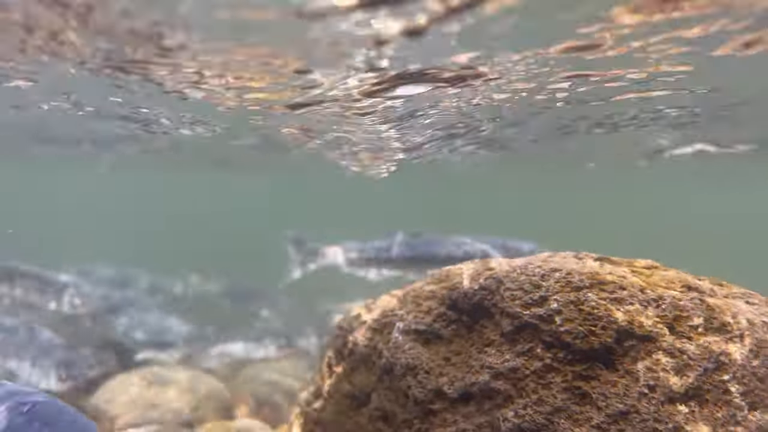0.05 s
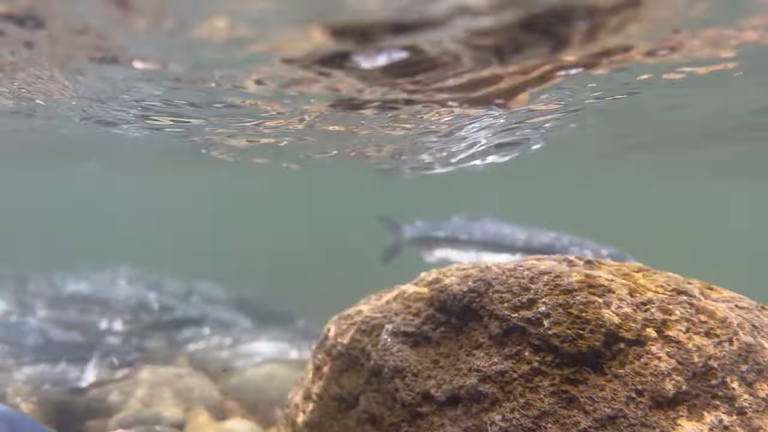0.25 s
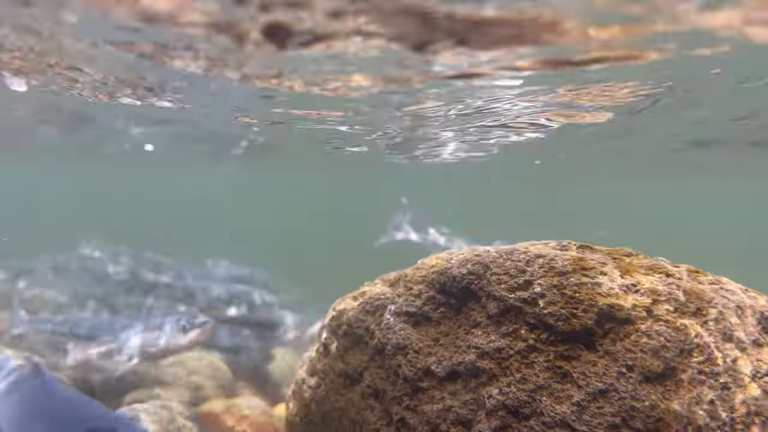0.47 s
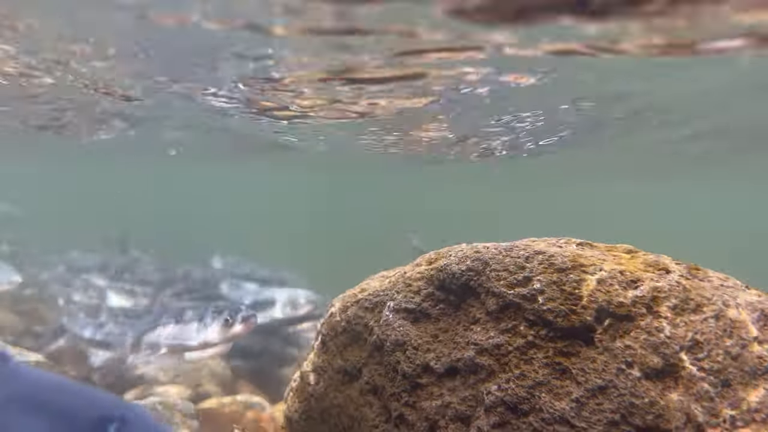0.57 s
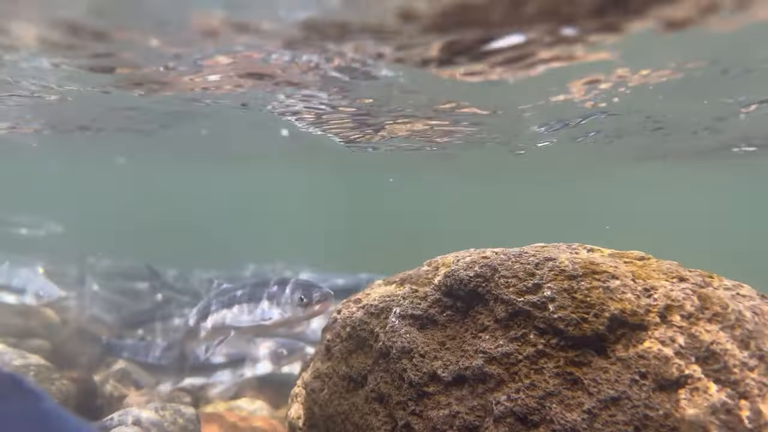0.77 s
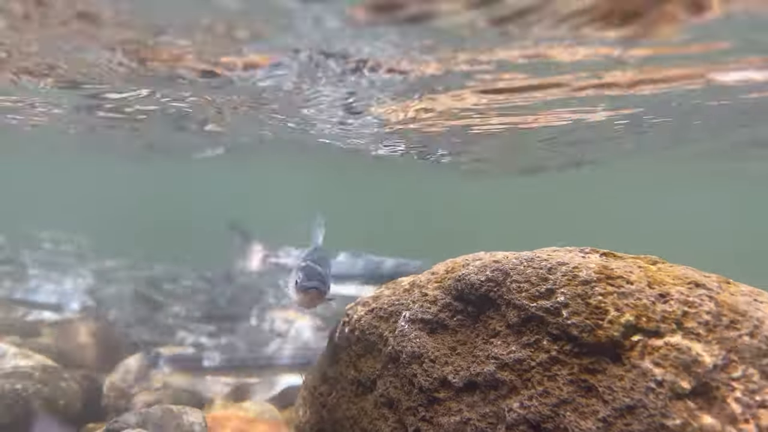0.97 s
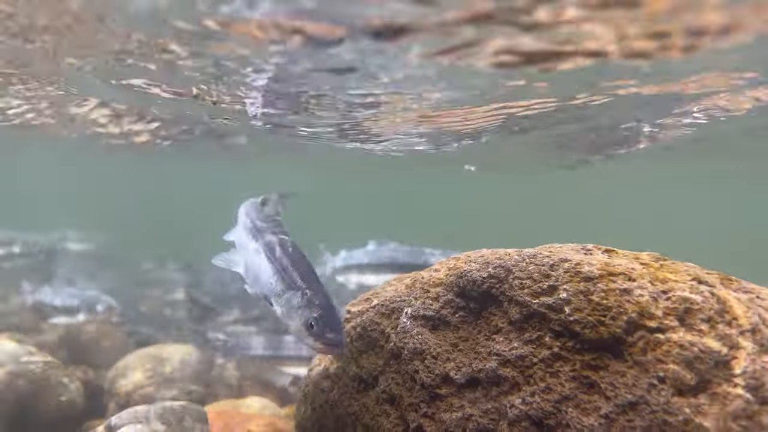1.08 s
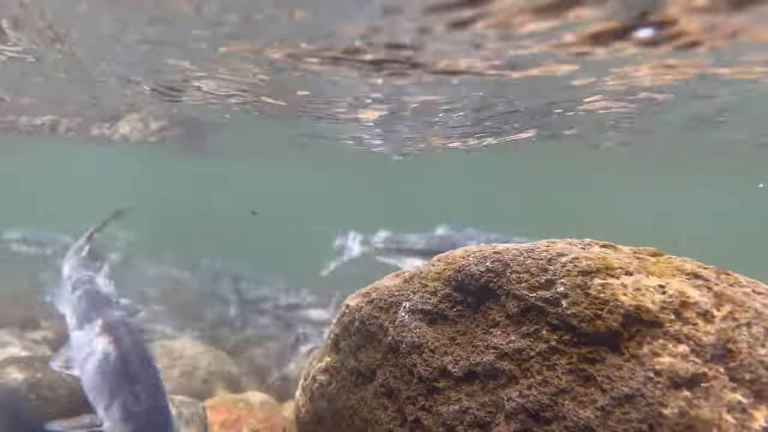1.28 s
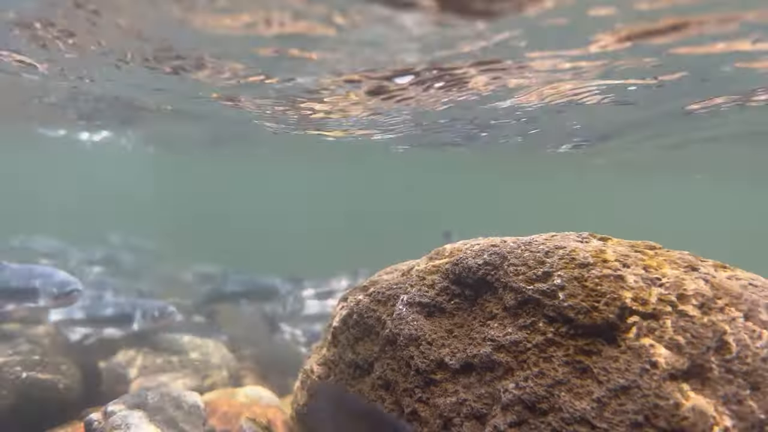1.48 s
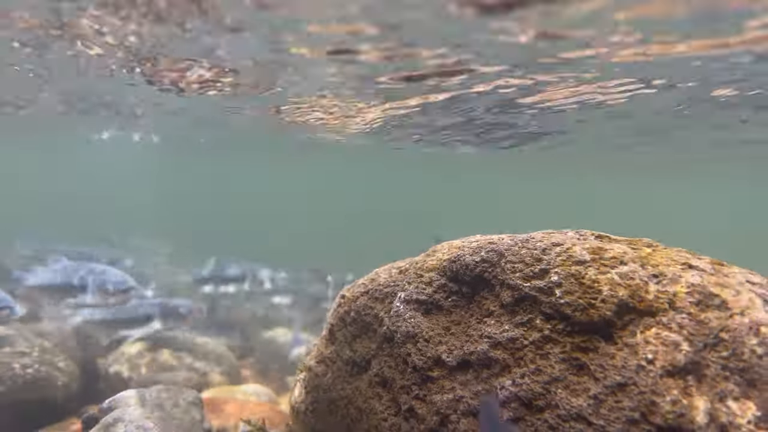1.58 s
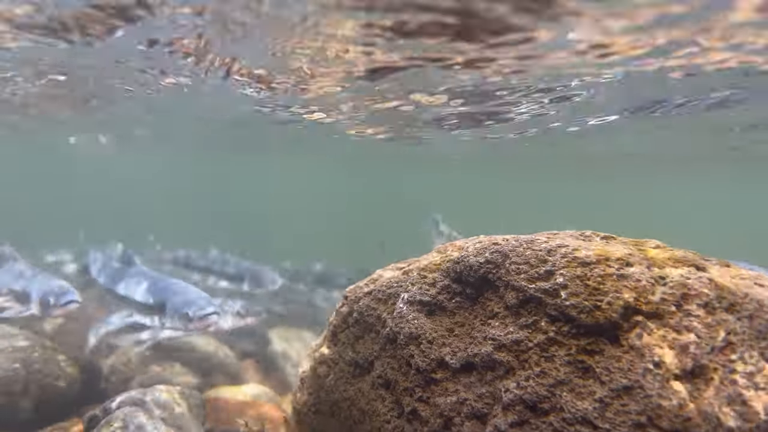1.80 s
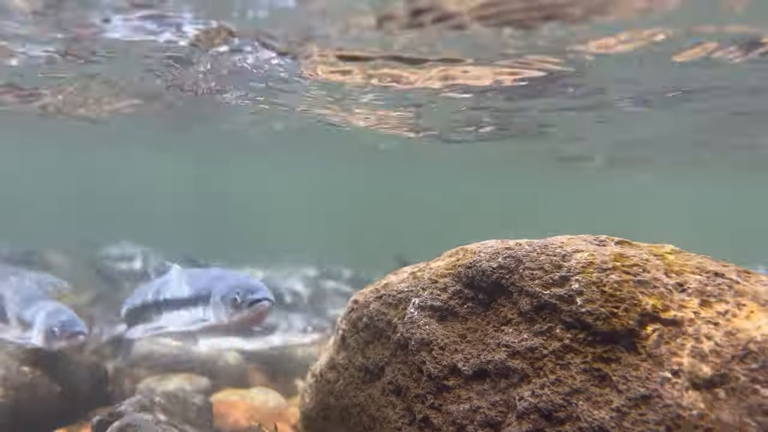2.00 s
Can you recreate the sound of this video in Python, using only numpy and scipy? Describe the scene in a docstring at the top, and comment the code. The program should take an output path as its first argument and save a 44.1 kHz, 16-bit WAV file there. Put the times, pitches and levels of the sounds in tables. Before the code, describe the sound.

Low underwater river rumble with pebbles knocking and small bubbles popping.

```python
"""A low underwater rumble: the current of a shallow river pushes on a camera housing and surges in gulps.
Pebbles knock and tick on the bed over a wash of grit, and one stone clacks close by.
Bubbles ring as they pinch off, a few rising in pitch as they die away.
The left port hears the river a little later and duller than the right; a limiter holds down the peaks."""
import sys
import numpy as np
from scipy import signal
from scipy.fft import rfft, irfft, next_fast_len
from scipy.io import wavfile
from scipy.ndimage import uniform_filter1d, minimum_filter1d

SR = 44100
rng = np.random.default_rng(int(sys.argv[2]) if len(sys.argv) > 2 else 0)


def materialize(psi):
    """Save the field psi as 16-bit PCM at rate SR to the path in sys.argv[1].

    A 1-D psi becomes a single channel; in a 2-D psi each row is a channel.
    """
    bounded = np.clip(np.atleast_2d(psi).T, -1, 1)
    quanta = np.round(bounded * 32767).astype(np.int16)
    wavfile.write(sys.argv[1], SR, quanta)


N = 90404


def undb(db):
    """Decibels to gain."""
    return 10 ** (np.asarray(db) / 20)


def unit(x):
    """Scale to rms 1."""
    return x / np.sqrt(np.mean(x ** 2) + 1e-20)


def add(out, at, x):
    """Mix x into out, starting at a time in seconds."""
    i = max(int(at * SR), 0)
    out[i:i + len(x)] += x[:max(len(out) - i, 0)]


def gains(curve, size):
    """Gain per frequency bin from an EQ curve of (Hz, dB) points."""
    hz, db = np.array(curve, float).T
    return undb(np.interp(np.log(np.fft.rfftfreq(size, 1 / SR) + 1), np.log(hz), db))


def colour(x, curve):
    """Filter x through an EQ curve."""
    size = next_fast_len(len(x) + 4096)
    return irfft(rfft(x, size) * gains(curve, size), size)[:len(x)]


def wobble(per_second):
    """A smooth random drift of rms 1."""
    hold = int(SR / per_second)
    steps = np.repeat(rng.standard_normal(N // hold + 1), hold)
    return unit(uniform_filter1d(uniform_filter1d(steps, hold), hold)[:N])


# The left port against the right. Each row: frequency in Hz, gain in dB, phase lag in radians.
LEFT_PORT = [(40, -2.8, 0.3), (150, -2.8, 0.5), (330, -7, .75), (450, -10, 1.4), (640, -13, 2.5),
             (800, -9.5, 3.4), (1000, -3.5, 4.4), (1300, -8.5, 4.9), (2100, -14, 5.8), (2400, -26, 5),
             (2900, -16, 3), (4630, -23.5, 5.5), (9210, -4, 7.5)]
def ports(x):
    """Mono to stereo: the housing's left port hears x later and duller, the right hears it as it is."""
    size = next_fast_len(N + 4096)
    hz, db, lag = np.array(LEFT_PORT).T
    delay = np.exp(-1j * np.interp(np.fft.rfftfreq(size, 1 / SR), hz, lag))
    left = irfft(rfft(x, size) * gains(list(zip(hz, db)), size) * delay, size)[:N]
    return np.array([left, x])


def wide_noise(curve, width):
    """Coloured noise at both ports, widened by a second noise that reaches the left alone."""
    stereo = ports(unit(colour(rng.standard_normal(N), curve)))
    stereo[0] += width * unit(colour(rng.standard_normal(N), curve))
    return stereo


# The tone of the rumble and of the wash. Each row: frequency in Hz, gain in dB.
RUMBLE_EQ = [(20, -21.5), (35, -4), (65, 3.5), (120, -5.5), (200, -9), (320, -14), (500, -23), (900, -41),
             (2000, -76.5), (12000, -120)]
WASH_EQ = [(150, -18), (400, -1.5), (700, 3), (1100, 0.5), (1500, -11), (2100, -22.5), (3000, -32),
           (5000, -39.5), (9000, -63.5)]
# Fader moves of the flow. Each row: time in seconds, rumble fader in dB, wash fader in dB.
FLOW_FADERS = [(0.0, -35.5, -50.5), (0.14, -25, -38), (0.26, -26.5, -48.5), (0.41, -25.5, -36.5),
               (0.49, -27, -41), (0.55, -26.5, -37.5), (0.68, -28, -44), (0.8, -25, -39.5),
               (0.87, -26.5, -40.5), (0.94, -28, -33), (1.01, -33, -44), (1.09, -29.5, -53.5),
               (1.15, -38.5, -54), (1.33, -37, -47.5), (1.45, -27.5, -41), (1.55, -32.5, -45.5),
               (1.62, -26, -40.5), (1.77, -36, -44), (1.91, -38, -51.5), (2.03, -42.5, -54)]
def current():
    """The bed of the mix: water rumbles on the housing under a wash of tiny bubbles and grit."""
    t = np.arange(N) / SR
    times, rumble_db, wash_db = np.array(FLOW_FADERS).T
    rumble = wide_noise(RUMBLE_EQ, width=0.65)
    rumble *= undb(np.interp(t, times, rumble_db) + 3.5 + wobble(18))
    grains_per_s, grain_spread_db = 140, 5.5
    grains = (rng.random(N) < grains_per_s / SR) * rng.choice([-1, 1], N)
    grains = grains * undb(grain_spread_db * np.minimum(rng.exponential(size=N), 2.6))
    grit = ports(unit(colour(grains, WASH_EQ))) * undb(-3.5)
    fizz = wide_noise(WASH_EQ, width=0.56) * undb(-0.5 + 2 * wobble(30))
    wash = signal.sosfilt(signal.butter(4, 10000, fs=SR, output="sos"), fizz + grit)
    return rumble + wash * undb(np.interp(t, times, wash_db))


def thump(hz, t60, attack_s=0.0039):
    """A soft push of water that rocks the housing for a few cycles."""
    t = np.arange(int(2 * t60 * SR)) / SR
    attack = 1 - np.exp(-(t / attack_s) ** 2)
    return np.sin(2 * np.pi * hz * t) * attack * np.exp(-np.log(1000) * t / t60)


# Gulps of the current. Each row: start in seconds, length in seconds, level in dB, centre in Hz.
SURGES = [(.04, .04, -25, 150), (0.25, .036, -15.5, 150), (0.262, .036, -19, 210), (0.308, 0.024, -20, 140),
          (0.366, .05, -13, 175), (0.488, 0.062, -21, 161.6), (0.699, .03, -13, 153.4),
          (0.877, 0.061, -6, 221), (1.084, .035, -24.5, 143), (1.342, 0.033, -28, 160),
          (1.492, .03, -17.5, 165), (1.643, .04, -22.5, 132), (1.691, 0.029, -31.5, 202)]
# Shoves of water. Each row: start in seconds, pitch in Hz, level in dB, seconds to fade by 60 dB.
THUMPS = [(0.287, 65.4, -2.5, 0.14), (0.385, 190, -6, .04), (0.695, 65, -7, .10), (0.926, 52.15, -1, .10),
          (1.064, 80, -11, 0.13), (1.231, 60.5, -6, 0.091), (1.496, 81.9, 0.5, 0.1), (1.569, 150, 5, 0.028),
          (1.727, 75.3, -18.5, 0.18), (1.824, 69.7, -15, 0.041)]
def eddies(width=0.5):
    """Turbulence swells in short gulps, partly different at each port, and shoves the housing."""
    shared, left_only = np.zeros(N), np.zeros(N)
    for at, length, db, hz in SURGES:
        size = int(length * SR)
        curve = [(hz / 8, -9), (hz, 0), (2 * hz, -9.33), (32 * hz, -126)]
        swell = np.sin(np.pi * np.arange(size) / size) ** 1.5
        for track in (shared, left_only):
            swirl = colour(rng.standard_normal(N // 8), curve)[2000:2000 + size]
            add(track, at, undb(db) * unit(swirl * swell))
    for at, hz, db, t60 in THUMPS:
        add(shared, at, undb(db) * thump(hz, t60))
    stereo = ports(shared)
    stereo[0] += width * ports(left_only)[0]
    return stereo


def bubble(hz, life, octaves, attack_s=0.00076, fade_db=14, choke_db=47.5):
    """One bubble: a steadily fading sine that climbs and chokes as it nears the surface."""
    t = np.arange(int(life * SR)) / SR
    age = t / life
    pitch = hz * 2 ** (octaves * age ** 4)
    attack = 1 - np.exp(-(t / attack_s) ** 2)
    fade = undb(-fade_db * age - choke_db * age ** 2)
    return np.sin(2 * np.pi * np.cumsum(pitch) / SR) * attack * fade


# Bubble clusters. Each row: start in seconds, length in seconds, level in dB, middle pitch in Hz.
GURGLES = [(0.554, .02, -29.5, 817), (.884, 0.019, -26.5, 789), (0.905, 0.018, -20, 1336),
           (.91, .022, -18.5, 483), (0.927, .035, -40, 1123), (1.388, .07, -41, 1002)]
def gurgles(count=12, life_s=0.012, spread_octaves=0.3):
    """Small bubbles pinch off in quick runs, scattered in timing, pitch and strength."""
    out = np.zeros(N)
    for at, length, db, hz in GURGLES:
        cluster = np.zeros(int((length + life_s) * SR))
        for k, (jitter, detune, strength) in enumerate(rng.uniform(-0.9, 1, size=(count, 3))):
            blip = bubble(hz * 2 ** (spread_octaves * detune), life_s, octaves=0.2)
            add(cluster, length * (k + 0.5 + jitter / 2) / count, undb(3.2 * strength) * blip)
        add(out, at, undb(db) * unit(cluster))
    return ports(out)


# Single bubbles. Each row: start in seconds, pitch in Hz, level in dB, life in seconds,
# rise over that life in octaves, trim at the left port in dB.
BUBBLES = [(0.2104, 814, -0.5, 0.009, 0.055, -13), (.21, 4850, -27.5, 0.0064, 0.024, -2.5),
           (1.766, 4650, -43.5, 0.0081, .02, -5.5), (.431, 1907, -20, 0.036, 2.4, -6.5),
           (.576, 505, -4.5, .026, .1, 2), (.577, 2185, -18, .033, .05, -4),
           (.641, 1070, -15.5, .016, .1, -7.5), (0.727, 2200, -30, .025, .05, 0.5),
           (.7358, 1096, -6, .014, .1, -9), (0.735, 5020, -34, .009, .02, -2),
           (.64, 5450, -42, .006, .02, -3), (.805, 3950, -43, .007, .02, -3),
           (.962, 3900, -42, .008, .02, -3), (1.043, 5550, -44, .03, .02, -9),
           (1.152, 4600, -42, 0.014, .02, -3.5), (1.429, 3430, -37, 0.009, .05, 6.5),
           (1.596, 3230, -41, .011, .03, -3), (1.594, 1390, -18.5, .014, .1, -14.5),
           (1.7206, 1118, -14, .046, 1.3, 2.5), (1.7524, 1014, -4, 0.07, .85, 4),
           (1.92, 1000, -23, .014, .05, 4), (1.92, 4980, -49, 0.014, .02, 3)]
def bubbles():
    """Lone bubbles ring as they pinch off, each with its own balance between the ports."""
    left, right = np.zeros(N), np.zeros(N)
    for at, hz, db, life, octaves, left_db in BUBBLES:
        ring = undb(db) * bubble(hz, life, octaves)
        add(right, at, ring)
        add(left, at, ring * undb(left_db))
    return np.array([ports(left)[0], right])


PRE_ROLL = 512  # samples ahead of each stone's hit
def contact(curve, sharpness=0.54, sag_cycles=0.852, size=4096):
    """A stone's hit heard through the housing: a couple of cycles that fall in pitch."""
    # Folding the cepstrum gives the phase of the hardest attack this EQ curve allows.
    cepstrum = irfft(np.log(gains(curve, size)))
    cepstrum[1:size // 2] *= 2
    cepstrum[size // 2 + 1:] = 0
    log_spectrum = rfft(cepstrum)
    sag = 2 * np.pi * sag_cycles * np.log(1 + np.fft.rfftfreq(size, 1 / SR) / 150)  # lows arrive late
    phase = sharpness * log_spectrum.imag - sag  # sharpness 1 hits at once, 0 swells in
    hit = np.roll(irfft(np.exp(log_spectrum.real + 1j * phase)), PRE_ROLL)
    return hit / np.abs(hit).max()


# Knocks on the bed. Each row: time in seconds, level in dB, then three EQ gains in dB:
# thud at 450 Hz, clack at 2.3 kHz, tick at 4.8 kHz.
KNOCKS = [(0.2095, -4, -3, -22.5, -32.5), (0.4302, -5.5, 4, -22.5, -63), (0.4367, -11.5, 0.5, -18.5, -62.5),
          (0.477, -23, 6, -36, -52), (0.544, -17, 5, -32, -50), (0.559, -18, 5, -32, -50),
          (0.568, -11, 5.5, -33, -46), (0.576, -1, 20, -16, -40.5), (0.617, -18, 6, -45, -51.5),
          (0.64, -12, 6, -46, -33), (0.729, -6, 19.5, -25.5, -43), (0.736, -9, -1.5, -38.5, -30),
          (0.805, -12, 8, -39.5, -35), (0.911, -8, -6.5, -21, -50), (0.9218, -9.5, 4.5, -21.5, -35),
          (0.942, -4.5, -2, -23, -55), (0.961, -14, 3, -29, -36), (1.017, -16.5, 16.5, -44.5, -45.5),
          (1.112, -27.5, -11.5, -59, -29.5), (1.1517, -17, -5, -24, -31.5), (1.286, -33, 0, -14, -30),
          (1.429, -15, -1.5, -21, -40), (1.459, -25, -2, -26, -48), (1.5693, 7.5, 11, -17, -45),
          (1.595, -19, -14.5, -17, -40), (1.615, -22, -3, -28, -52), (1.6302, -7, 4, -29, -41),
          (1.721, -23.5, -28.5, -24.5, -57), (1.7535, -9, 3, -25.5, -41), (1.758, -12, 3, -25, -39),
          (1.9198, -11, 1.5, -27, -42), (1.987, -36.5, 11, -24, -45), (2.005, -21.5, 5, -26, -48),
          (2.019, -26, -2, -9, -25)]
def pebbles():
    """Pebbles knock together further off, each with its own tone around the housing's 1.1 kHz ring."""
    out = np.zeros(N)
    for at, db, thud, clack, tick in KNOCKS:
        curve = [(30, thud - 53.5), (170, thud - 9.5), (450, thud), (800, thud / 2 + 2),
                 (1100, 1.5), (1500, -9), (2300, clack), (3300, (clack + tick) / 2 - 1),
                 (4800, tick), (6300, tick - 20), (10000, tick - 38), (17000, tick - 40)]
        add(out, at - PRE_ROLL / SR, undb(db) * contact(curve))
    return ports(out)


# The bright tone of the close stone. Each row: frequency in Hz, gain in dB.
CLACK_EQ = [(30, -20), (200, 2), (470, 1), (1300, 0), (2330, -5), (3200, -10.5), (4200, -20), (5100, -26),
            (6200, -42), (7200, -39), (16000, -50)]
# Its strike. Each row: time in seconds, level in dB.
CLACKS = [(1.0526, 3.5)]
def close_stone(echo_s=0.0011, echo_db=-6):
    """A stone clacks close by; the surface mirrors it back a moment later with its polarity flipped."""
    out = np.zeros(N)
    hit = contact(CLACK_EQ)
    for at, db in CLACKS:
        start = at - PRE_ROLL / SR
        add(out, start, undb(db) * hit)
        add(out, start + echo_s, -undb(db + echo_db) * hit)
    return ports(out)


def scene():
    """The river as the two ports hear it: moving water, bubbles, and stones in front."""
    stones = pebbles() + close_stone()
    stones[0] *= undb(0.5)  # left trim
    return current() + eddies() + gurgles() + bubbles() + stones


def record(dry, ceiling=0.96, limiter_s=0.004, bottom_hz=26, top_hz=16300):
    """The recorder cuts the deepest bass, ducks the loudest peaks and cuts the top."""
    x = signal.sosfilt(signal.butter(2, bottom_hz, "high", fs=SR, output="sos"), dry)
    window = int(limiter_s * SR)
    duck = minimum_filter1d(ceiling / np.maximum(np.abs(x), ceiling), 2 * window)
    limited = x * uniform_filter1d(uniform_filter1d(duck, window), window)
    return signal.sosfilt(signal.ellip(8, 0.2, 70, top_hz, fs=SR, output="sos"), limited)


dry = scene()
out = record(dry)
materialize(out)
```